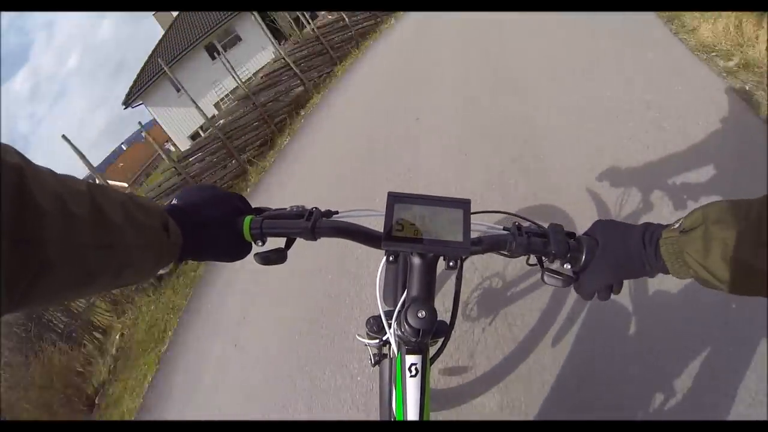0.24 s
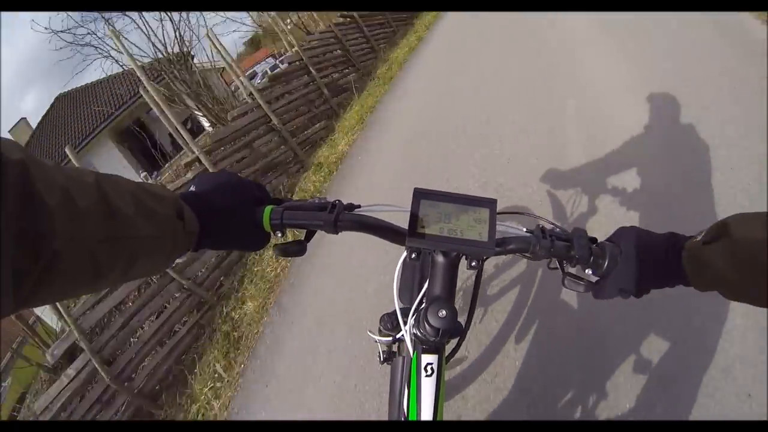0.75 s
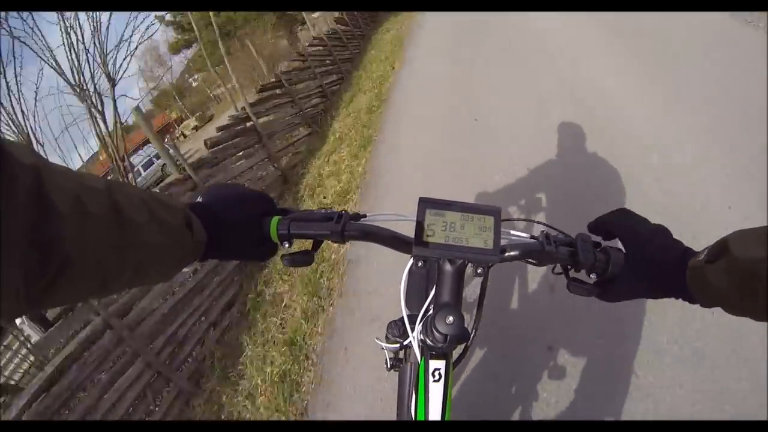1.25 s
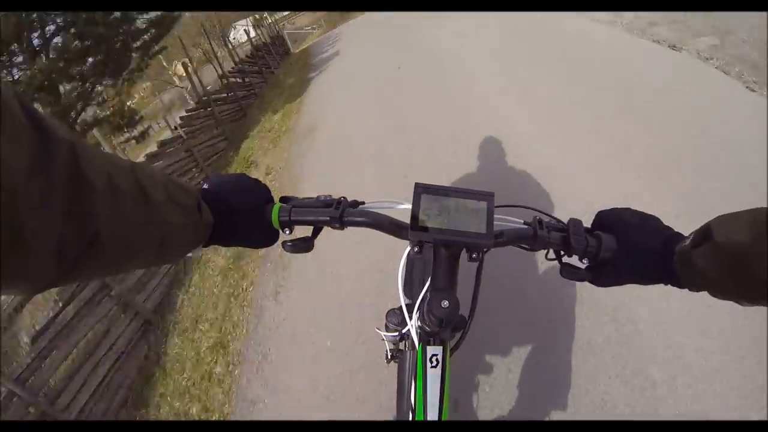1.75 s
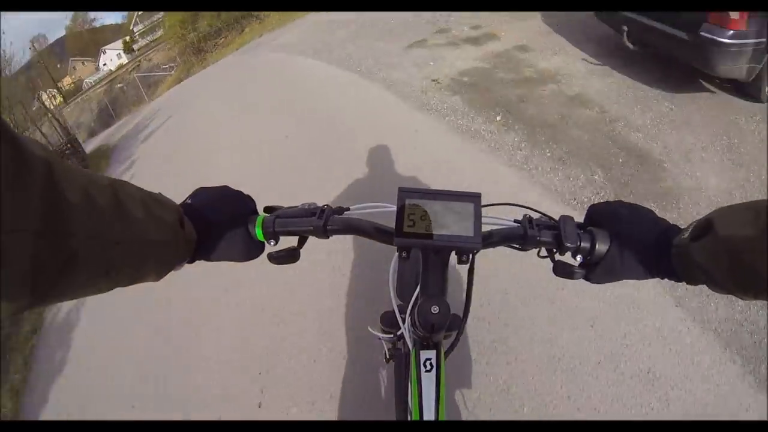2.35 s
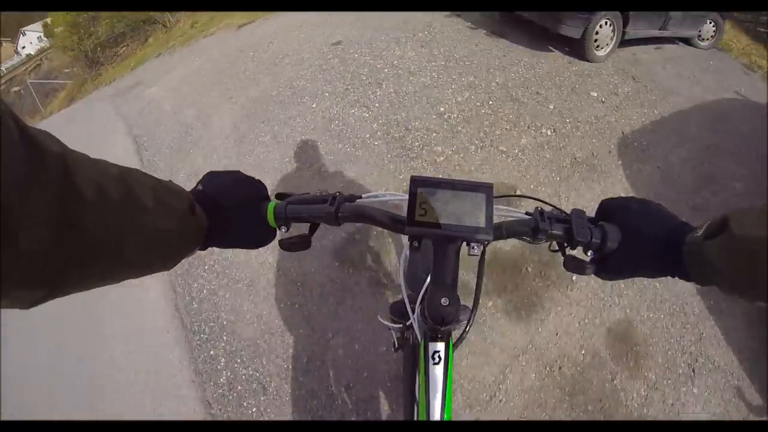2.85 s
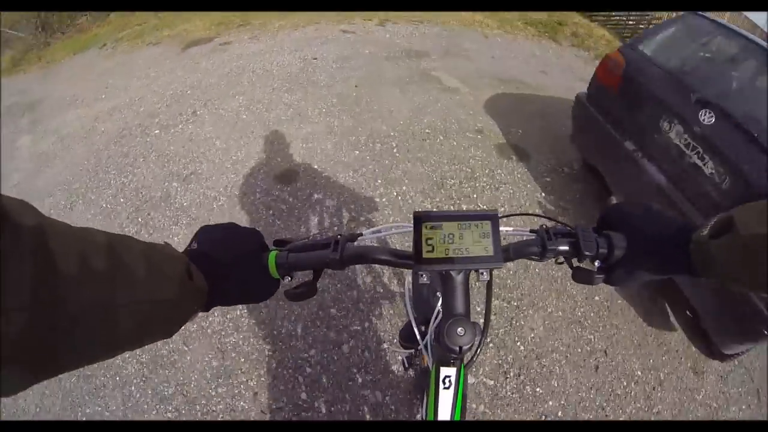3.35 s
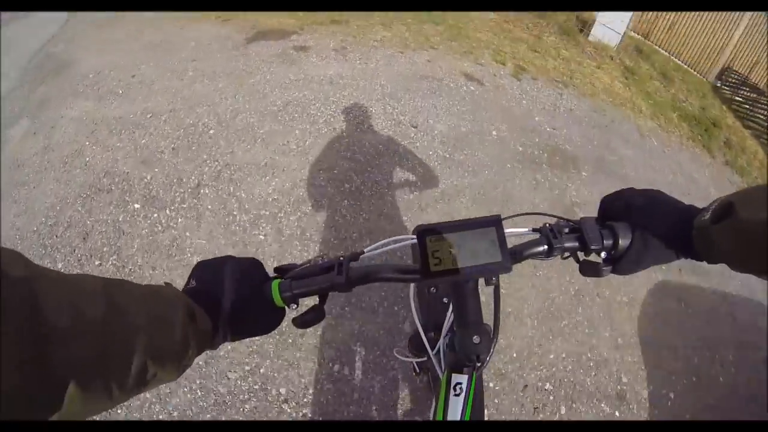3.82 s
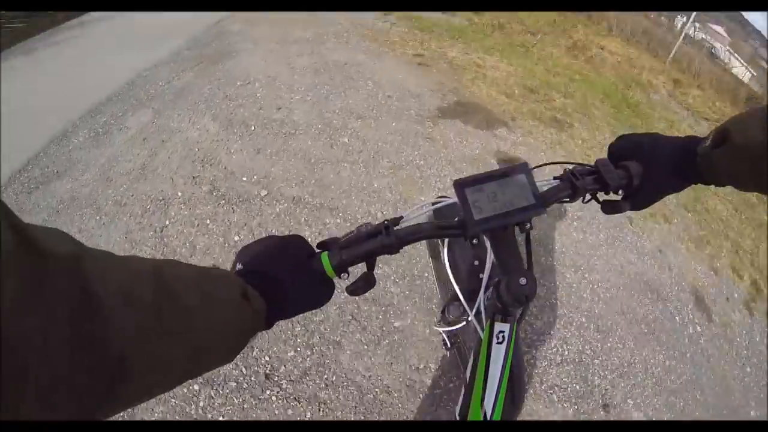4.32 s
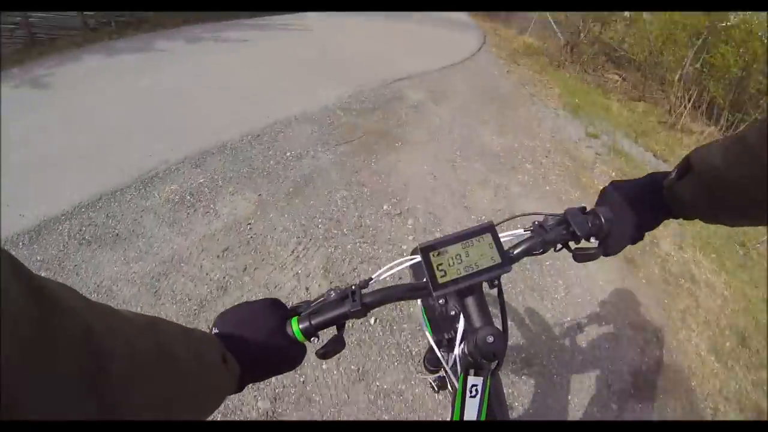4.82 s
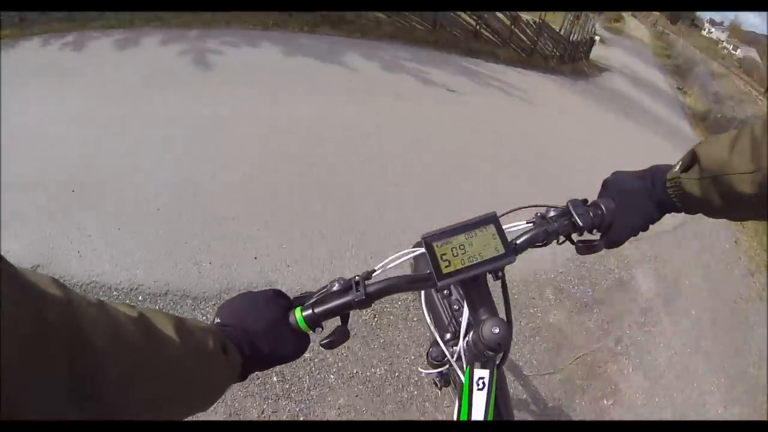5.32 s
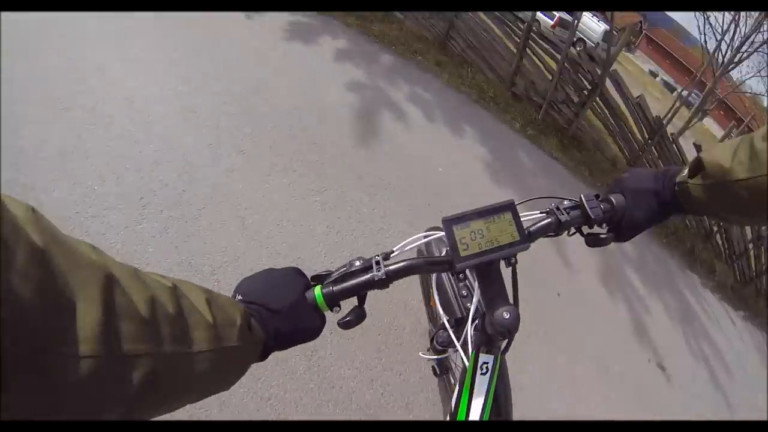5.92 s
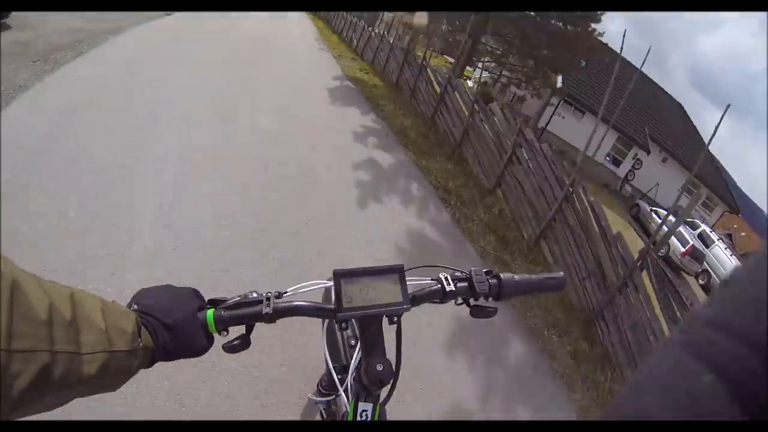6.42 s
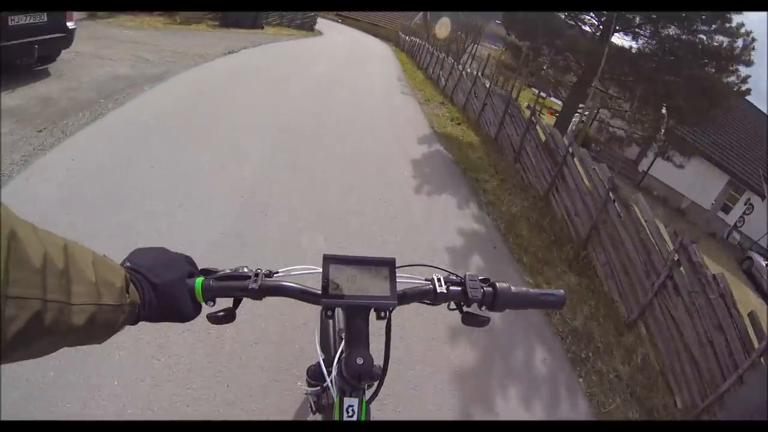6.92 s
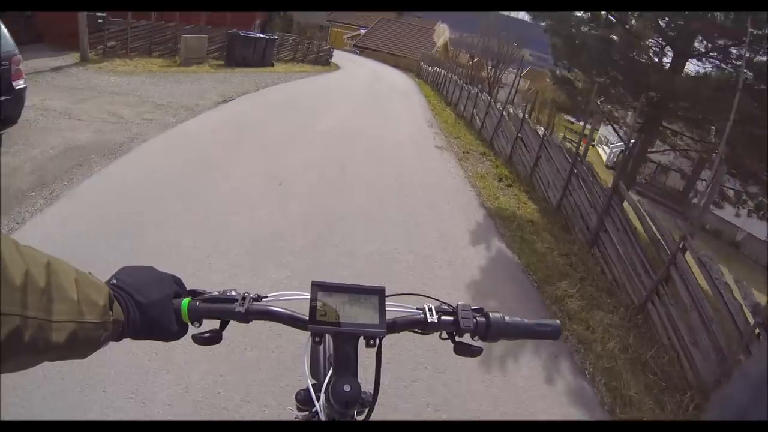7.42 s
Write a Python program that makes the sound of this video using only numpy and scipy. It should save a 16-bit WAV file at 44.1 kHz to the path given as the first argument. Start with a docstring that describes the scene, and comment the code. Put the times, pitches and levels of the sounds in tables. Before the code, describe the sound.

An electric bicycle rides outdoors, heard from a cased microphone on the rider. Deep, uneven wind rumble runs throughout, over a thin, slightly wavering motor whine and a boxy whirr of drive and tyres. A freewheel ticks very faintly at first. From about 2 to 4 seconds the disc brake sings softly on one high note, with tiny, much higher chirps. At about 2.8 seconds sharp clicks and a dull thud mark the move onto gravel. Stones crunch and pop, fittings click and grit hisses in short swells, with more thuds around 5 and 6 seconds. Near 6 seconds the tyres return to firmer ground. At 6.6 seconds a glove rubs across the microphone in scratchy strokes, then knocks its case several times, loudest at about 7 and 7.3 seconds, well above the ride. One more brief rub comes at about 7.6 seconds.

```python
"""An electric bicycle rolls over asphalt, heard from a cased camera on the rider: wind buffets the case,
the motor whines, the freewheel ticks, and drive and tyre noise ring in the case's resonances.
From about 2 s the disc brake sings and chirps through a turn onto gravel, where stones crunch, fittings
click and rough patches swell and thud. Near 6 s the bicycle is back on firmer ground.
From 6.6 s a glove rubs over the camera and knocks it several times."""
import sys
import numpy as np
from scipy import signal
from scipy.fft import rfft, irfft, next_fast_len
from scipy.io import wavfile
from scipy.ndimage import uniform_filter1d

SR = 44100
rng = np.random.default_rng(int(sys.argv[2]) if len(sys.argv) > 2 else 0)


def file_out(sig):
    """Save sig as 16-bit WAV at sys.argv[1]."""
    # one column per channel
    cols = np.atleast_2d(sig).T
    # limit, then scale
    lim = np.clip(cols, -1, 1)
    pcm = np.round(lim * 32767).astype(np.int16)
    wavfile.write(sys.argv[1], SR, pcm)


N = 337806
TIME = np.arange(N) / SR

# The wind bed. Each row: time in seconds, rumble in dB, deep sway in dB.
WIND_LEVELS = [(0, -41.5, -20.5), (0.7, -43.5, -37), (1.05, -42.5, -33.5), (1.35, -41.5, -27.5),
               (1.8, -47, -40.5), (2.1, -45, -35), (2.74, -50.5, -40), (2.9, -36.5, -29.5),
               (3.1, -47.5, -17), (3.4, -42.5, -30), (3.75, -44, -30.5), (4.25, -50.5, -38.5),
               (4.9, -47, -29.5), (5.4, -51, -22.5), (5.8, -42, -37), (6.4, -44.5, -38.5),
               (6.7, -38.5, -30.5), (7.3, -50.5, -32.5), (7.65, -49, -27)]
# Swells and dips of the deep sway and rumble as the bicycle rides along. Each row: middle and half
# length in seconds, change of sway and of rumble in dB.
SWAY_SWELLS = [(0.317, 0.038, -0.5, -5.5), (0.655, 0.12, 5, 3.5), (0.85, 0.061, 7, -2),
               (1.307, 0.11, 2, -1.5), (1.604, .06, 5, 6), (1.753, 0.13, 13.5, 1), (1.987, 0.043, 6.5, 1),
               (2.428, 0.26, 6.5, 0), (3.34, 0.089, 6.5, -2), (3.75, 0.077, 8.5, -8), (4.483, 0.023, 9, 1),
               (4.77, 0.031, 1.5, 5), (5.32, 0.092, -4, -7), (5.458, 0.046, -13, -4), (5.627, 0.015, 7, -2),
               (6.07, 0.098, 7, -6)]
# Wind colours, from deep to bright. Each row: frequency in Hz, spectral level in dB.
SWAY_EQ = [(8, -8), (16, 9.5), (28, -3.5), (38, -2), (55, -22.5), (90, -20.5), (200, -92)]
RUMBLE_EQ = [(25, -43), (48, 1.5), (75, -5.5), (115, -7.5), (160, -20), (260, -47.5), (600, -68)]
BUFFET_EQ = [(70, -19), (150, 1), (230, -7), (320, -6.5), (450, -17), (620, -22), (1100, -24), (2500, -59)]

# The coasting freewheel. Each row: time in seconds, ticks per second, level in dB.
FREEWHEEL = [(0, 95, -82), (0.7, 86, -88), (1.4, 134, -83), (2.0, 92, -81), (2.5, 66, -100)]
# The drive's whirr, sinking as the bicycle slows. Each row: time in seconds, level in dB.
DRIVE_LEVELS = [(0, -53.5), (0.7, -52), (1.15, -55.5), (1.7, -57), (2.72, -62.5), (3.3, -58.5),
                (4.1, -62.5), (5.7, -65.5), (6.6, -58.5), (7.35, -68), (7.65, -60)]
# Narrow bands. Each row: centre in Hz, width in Hz, gain in dB.
PAWL_BANDS = [(6480, 610, 17), (7950, 420, -10)]  # pawls of the freewheel
WHIRR_BANDS = [(646, 270, -16), (977, 56, -13), (1357, 178, -5.5), (1539, 170, -0.5), (1910, 170, -15),
               (2280, 510, -14.5), (3400, 290, -17.5), (4890, 510, -27.5), (6610, 550, -28.5),
               (7810, 330, -26), (11220, 360, -34)]  # resonances of the case, plus a faint, thin electronic hiss near 11 kHz
RASP_BANDS = [(1463, 200, 3), (1814, 140, -0.5), (2060, 120, -8), (2600, 140, -22), (3230, 220, -14),
              (4700, 380, -24), (6050, 500, -27.5)]  # cloth on the shell

# The ground. Each row: time in seconds, looseness from 0 to 1, tyre hiss and crunch in dB.
GROUND = [(0, 0.2, -68), (0.7, 0, -70), (1.5, 0.53, -64.5), (2.8, 0.46, -64.5), (2.87, 0.91, -66),
          (4.2, 0.87, -64.5), (4.8, 0.82, -67.5), (5.6, 0.85, -68), (5.75, 0.13, -66), (6.6, 0.36, -62),
          (7.45, 0.76, -70)]
# Rough patches. Each row: middle and half length in seconds, lift of rolling and of buffeting in dB.
ROUGH_PATCHES = [(0.593, 0.28, -1, 4.5), (1.505, 0.042, 1.5, 0.5), (1.637, 0.034, 4.5, 8),
                 (2.932, 0.094, 7.5, -3), (3.05, 0.036, -1, -5), (3.128, 0.1, 8, 4.5), (3.643, 0.15, 6, -4),
                 (4.295, 0.036, 6.5, 1.5), (4.406, 0.02, 9, -2), (4.81, 0.17, 8.5, 4.5),
                 (4.92, 0.029, 6, -1), (4.982, 0.095, 3.5, 9), (5.215, 0.086, 5, 7.5), (5.45, 0.13, 5, 2),
                 (5.604, 0.033, 9, 7), (5.87, 0.059, 6.5, -0.5), (6.014, 0.04, 5, 8.5),
                 (6.486, 0.15, -0.5, 4)]
# The tread sweeping through grit. Each row: middle and half length in seconds, level in dB.
GRIT_SWEEPS = [(2.885, 0.021, -52), (4.823, 0.029, -52.5), (4.9, 0.04, -55), (4.976, 0.027, -49),
               (5.042, 0.036, -58), (5.156, 0.047, -55), (5.361, 0.028, -56), (5.523, 0.03, -58),
               (5.757, 0.028, -56.5), (6, 0.078, -61), (6.282, 0.085, -81), (6.432, 0.052, -54),
               (6.53, 0.033, -50.5)]
# Dips that bounce the rider and bumps that thud in the frame. Each row: time in seconds, level in dB.
DIPS = [(2.888, -10), (3.119, -9)]
BUMPS = [(3.013, -21), (4.845, -30), (4.923, -22.5), (5.31, -30), (6.048, -23), (6.575, -24)]
# Stones and fittings. Each row: start in seconds, level in dB, ring in Hz, fade in seconds, snap share.
CLICKS = [(1.503, -39.5, 1350, 0.0014, .1), (1.739, -42, 3420, 0.0021, 0.27),
          (2.8454, -27.5, 1510, 0.0064, 0.11), (2.848, -32.5, 3280, 0.0032, 0.33),
          (2.8485, -29.5, 2230, 0.0041, 0.092), (3.205, -39.5, 1550, 0.0019, 0.29),
          (3.266, -34, 1600, 0.0028, 0.27), (3.592, -44, 1580, 0.0015, 0.18),
          (3.635, -39, 1560, 0.0021, 0.084), (3.851, -42, 1580, 0.0032, 0.16),
          (3.921, -45, 1610, 0.0014, 0.49), (4.06, -38.5, 1520, 0.0013, 0.09),
          (4.1833, -33.5, 2250, 0.0041, 0.29), (4.818, -42, 2340, 0.0066, 0.3),
          (4.994, -39, 1540, 0.007, .1), (5.144, -42, 1540, 0.006, 0.22), (5.281, -55, 3420, 0.0008, 1),
          (5.425, -42.5, 2340, 0.0027, 0.82), (5.563, -47, 1540, 0.0023, 0.16),
          (5.604, -39, 1500, 0.0025, 0.14), (5.835, -53, 3500, 0.002, 0.74),
          (6.049, -40, 1370, 0.0027, 0.091), (6.065, -41.5, 1310, 0.0041, 0.19),
          (6.253, -36, 1460, 0.0013, 0.056), (6.309, -44.5, 1490, 0.0014, 0.12),
          (6.412, -44, 1570, 0.0046, .05), (6.502, -41, 1400, 0.00095, 0.079),
          (7.28, -29.5, 3280, 0.00008, 0.27)]
# Ground colours. Each row: frequency in Hz, spectral level in dB.
GRAVEL_EQ = [(300, -17), (800, -27), (1150, -33), (1550, -25), (1750, -16), (1880, 8), (2040, -3),
             (2260, 8.5), (2450, -5.5), (2850, -4), (3450, 0), (4200, -7), (5200, -8), (8800, -17.5),
             (15000, -27.5)]  # crunch under the tyres
PEBBLE_EQ = [(500, -19), (1000, -9), (1500, -6), (1900, -14), (2350, 18.5), (2950, -4), (3450, 13),
             (4300, -15), (5500, -31), (8000, -42), (15000, -48)]  # single stones popping
GRIT_EQ = [(300, -15), (700, -7), (1050, -3), (1500, 7.5), (1900, -6.5), (2400, 1), (2950, -11), (3500, -4),
           (4400, -15), (6500, -19), (9000, -29), (15000, -36)]  # dry hiss under the tread
SCRAPE_EQ = [(300, 10), (800, -19), (1150, -15), (1500, 20.5), (1950, 1), (2330, 9.5), (2950, -9),
             (3450, 3.5), (4200, -38), (5200, -23), (8000, -24), (15000, -47)]  # a stone's scrape, muffled by the case
SNAP_EQ = [(1500, -26), (2300, 2), (3500, 18), (5000, 0), (8000, -12), (11000, -30), (15000, -33)]  # a hard contact

# Squeezes of the brake. Each row: start and length in seconds, singing in dB, rubbing in dB.
BRAKE_SQUEEZES = [(1.934, 0.25, -62.5, -63.5), (2.184, 0.05, -50.5, -56), (2.23, 0.051, -56, -57),
                  (2.295, 0.096, -59, -59), (2.508, 0.62, -76, -68.5), (3.08, 0.696, -68, -62),
                  (3.822, 0.14, -75, -65.5), (3.996, 0.075, -62, -61)]
# Thin chirps of the disc. Each row: middle in seconds, level in dB, pitch in Hz, length in seconds,
# glide as a share of the pitch.
DISC_CHIRPS = [(1.889, -66, 12200, 0.04, .03), (1.922, -59, 12500, 0.043, 0.037),
               (2.112, -63, 12530, 0.027, 0), (2.148, -75, 13350, 0.098, .07),
               (2.413, -68, 13000, 0.03, .01), (2.49, -64, 13950, 0.094, 0.024),
               (2.636, -72, 13500, 0.056, .03), (2.732, -64, 13250, 0.04, -.02),
               (2.785, -75, 13800, 0.06, .04), (3.146, -60.5, 13250, 0.024, .01),
               (3.57, -53, 13130, 0.04, -.012), (3.629, -63, 13450, 0.05, .025),
               (3.75, -64, 14050, 0.088, -.03), (3.971, -53.5, 10630, 0.046, -.01),
               (4.059, -61, 10650, 0.045, .03), (4.085, -64, 11500, 0.035, 0.014)]

# Strokes of the glove. Each row: start, rise and length in seconds, level in dB, share of sharp
# scratch, pitch ratio of the rasp.
GLOVE_STROKES = [(6.636, 0.0031, 0.02, -33.5, 0.061, 1.03), (6.661, 0.012, 0.019, -35.5, 0.1, 1.06),
                 (6.687, 0.01, 0.024, -32, 0.04, 1.12), (6.709, 0.013, 0.047, -31.5, 0.098, 1.1),
                 (6.775, 0.028, 0.038, -29, 0.28, 1.06), (6.829, 0.041, 0.074, -37.5, 0.05, 1.1),
                 (6.876, 0.0086, 0.054, -34.5, 0.055, 1.0), (6.94, 0.012, 0.087, -47, 0.32, 1.15),
                 (7.032, 0.011, 0.247, -54, 0.25, 1.08), (7.589, 0.11, 0.08, -34, 0.21, 0.95)]
# Knocks of the glove. Each row: time in seconds, push in dB, contact in seconds, sway in dB, sway in Hz,
# shell ring in dB, hardness as the ring's cutoff in Hz, hollow ring in dB, crack in dB.
KNOCKS = [(6.897, -11, 0.00021, -17.5, 89, -8.5, 1810, -44, -35),
          (6.9787, 0.5, 0.00038, -10.5, 46.8, 0.5, 4500, -26, -9.5),
          (7.071, -15.5, 0.00061, -4.5, 30, -43, 2500, -57, -33),
          (7.102, -31, 0.00024, -47, 30, -26, 1700, -40.5, -33),
          (7.218, -30, 0.00044, -18.5, 28.2, -13.5, 1400, -33, -40),
          (7.2567, -0.5, 0.00052, -2.5, 31.7, -1, 1410, -33, -22),
          (7.315, -42, 0.00021, -27, 40.5, -45, 900, -51, -55),
          (7.358, -44, 0.00025, -31, 40.4, -37, 1200, -46.5, -42),
          (7.423, -41, 0.00039, -47, 40, -52, 900, -67, -58)]
# Modes of the struck case. Each row: pitch in Hz, level in dB, time to fall 60 dB in seconds.
SHELL_MODES = [(784, -8.5, 0.0076), (1504, 0, 0.013), (1935, 2.5, 0.0053), (2500, -3.5, 0.0067),
               (3490, -7, 0.011), (4550, -15.5, 0.017), (6960, -30, 0.0026)]
# Close-up colours. Each row: frequency in Hz, spectral level in dB.
RUB_EQ = [(300, -49), (600, -16), (780, -10), (930, -13), (1150, -9.5), (1330, 5.5), (1500, 0),
          (2000, -1.5), (2450, -8), (3000, -15.5), (4400, -22.5), (6500, -42), (11000, -43), (15000, -60)]  # body of the glove's rub
SCRATCH_EQ = [(1500, -31), (2800, 5), (3800, 3.5), (5000, -6), (7000, -11.5), (9000, -32), (15000, -41)]  # scratching fibres
FIZZ_EQ = [(3000, -9.5), (6500, -3), (8800, -7.5), (10500, -8), (13500, -15), (15000, -23)]  # fizz of the cloth
CRACK_EQ = [(200, -7), (650, -7), (1000, 4), (1450, 7), (2700, -7), (4000, -18), (5500, -18.5), (8000, -27),
            (15000, -38)]  # a loose joint in the case
MIC_HISS_EQ = [(1000, -23), (11000, 13), (13000, -5), (15000, -10)]  # the microphone's noise floor


def amp(db):
    """Decibels to gain."""
    return 10 ** (np.asarray(db) / 20)


def unit(x):
    """Scales to rms 1."""
    return x / np.sqrt(np.mean(x ** 2) + 1e-20)


def noise(n=N):
    """White noise of rms 1."""
    return rng.standard_normal(n)


def curves(rows):
    """Each column of a time table as an automation curve."""
    s, *columns = np.transpose(rows)
    return [np.interp(TIME, s, column) for column in columns]


def add(mix, s, sound):
    """Mixes a sound in at time s."""
    part = mix[max(round(s * SR), 0):][:len(sound)]
    part += sound[:len(part)]


def colour(x, points):
    """Equalises by a curve of (Hz, dB) points."""
    hz, db = np.transpose(points)
    size = 2 * next_fast_len(len(x) // 2 + 2048)
    bins_hz = np.fft.rfftfreq(size, 1 / SR)
    gain = amp(np.interp(np.log(bins_hz + 1), np.log(hz + 1), db))
    return irfft(rfft(x, size) * gain)[:len(x)]


def resonate(x, hz, width):
    """A resonance of gain 1, applied twice for steep flanks."""
    b, a = signal.iirpeak(min(hz, SR * .45), hz / (1.55 * width), fs=SR)
    return signal.lfilter(b, a, signal.lfilter(b, a, x))


def glide(x, hz, width):
    """A steep resonance of gain 1 that follows the curve hz."""
    carrier = np.exp(2j * np.pi * np.cumsum(hz) / SR)
    r = np.exp(-1.55 * np.pi * width / SR)
    return 2 * (carrier * signal.lfilter([(1 - r) ** 2], [1, -2 * r, r * r], x / carrier)).real


def sine(hz):
    """A sine that follows the pitch curve hz."""
    return np.sin(2 * np.pi * np.cumsum(hz) / SR)


def wander(per_s):
    """Smooth random modulation of rms 1 that changes so many times a second."""
    knots = rng.standard_normal(8192)
    return unit(np.interp(TIME * per_s, np.arange(len(knots)), knots))


def grains(per_s, spread_db):
    """Sparse clicks of unequal size."""
    size = amp(spread_db * np.minimum(rng.exponential(1, N), 4))
    return unit(size * rng.choice([-1, 1], N) * (rng.random(N) < per_s / SR))


def hump(s, half):
    """Envelope that swells to 1 at time s and sinks again."""
    return np.exp(-((TIME - s) / half) ** 2)


def swell(start, rise, length, release):
    """Envelope that eases in, holds to the end of its length and dies away."""
    t = TIME - start
    attack = np.sin(np.pi / 2 * np.clip(t / rise, 0, 1)) ** 2
    return attack * np.exp(-np.maximum(t - length, 0) / release)


def push(t, contact_s):
    """One rounded pulse of pressure around t = 0."""
    return 1 / np.cosh(np.minimum(abs(t) / contact_s, 50))


def swing(t, hz, fade_s):
    """A few dying swings from t = 0 on."""
    after = np.maximum(t, 0)
    return np.sin(2 * np.pi * hz * after) * np.exp(-(after / fade_s) ** 2)


def patch_lift():
    """The dB that rough patches add to the rolling noise."""
    return sum(db * hump(s, half) for s, half, db, _ in ROUGH_PATCHES)


def wind(buffet_db=-5, eddy_db=2.1, speed_share=0.29):
    """Large eddies sway and rumble; small ones flutter on the case, more at speed and on rough patches."""
    rumble_db, sway_db = curves(WIND_LEVELS)
    flutter_db = (1 - speed_share) * rumble_db + speed_share * curves(DRIVE_LEVELS)[0] + buffet_db
    flutter_db += sum(db * hump(s, half) for s, half, _, db in ROUGH_PATCHES) - 0.2 * curves(GROUND)[0]
    sway_db += sum(db * hump(s, half) for s, half, db, _ in SWAY_SWELLS)
    rumble_db += sum(db * hump(s, half) for s, half, _, db in SWAY_SWELLS)
    sway = unit(colour(noise(), SWAY_EQ))
    sway /= np.sqrt(uniform_filter1d(sway ** 2, size=4000) + 0.02)  # evens out the large eddies
    eddies = amp(eddy_db * wander(per_s=45))
    rumble, flutter = (unit(colour(noise() * eddies, eq)) for eq in (RUMBLE_EQ, BUFFET_EQ))
    return amp(sway_db) * sway + amp(rumble_db) * rumble + amp(flutter_db) * flutter


def freewheel(tick_s=0.0008, uneven_db=3):
    """The pawls tick faintly over the ratchet, slower as the bicycle loses speed."""
    rate, level_db = curves(FREEWHEEL)
    since_tick = np.cumsum(rate) / SR % 1 / rate
    ticks = np.exp(-since_tick / tick_s) * noise() * amp(uneven_db * wander(per_s=60))
    return amp(level_db) * unit(sum(amp(db) * resonate(ticks, hz, width) for hz, width, db in PAWL_BANDS))


def motor(hz=1575, trim_db=-5.5, flutter_db=3.5):
    """A thin, slightly wavering whine stands out of the whirr of the drive."""
    pitch = hz * (1 + 0.014 * wander(per_s=19) + 0.016 * wander(per_s=200))
    whine = sine(pitch) * amp(flutter_db * wander(per_s=63))
    return amp(curves(DRIVE_LEVELS)[0] + trim_db + 0.71 * patch_lift()) * unit(whine)


def rolling(whirr_trim_db=-0.36, crunch_trim_db=-3, shake_db=2.5, grit=0.62, rattle=0.45):
    """Drive and tyres ring the case under a thin hiss; stones crackle; all swell on rough patches."""
    loose, tyre_db = curves(GROUND)
    whirr_db = curves(DRIVE_LEVELS)[0] + patch_lift() + whirr_trim_db
    crunch_db = tyre_db + 0.22 * patch_lift() + crunch_trim_db
    shake = amp(shake_db * np.sqrt(loose) * wander(per_s=50))  # steady on asphalt, uneven on gravel
    ticks = rattle * loose * grains(per_s=300, spread_db=7)  # small parts rattle on the frame
    whirr = unit(sum(amp(db) * resonate(noise() + ticks, hz, width) for hz, width, db in WHIRR_BANDS))
    crunch = unit(colour(noise() + grit * loose * grains(per_s=780, spread_db=4.5), GRAVEL_EQ))
    return shake * (amp(whirr_db) * whirr + amp(crunch_db) * crunch)


def pebbles(level_db=-63, patch_share=0.8, grind=0.97):
    """On very loose ground single stones grind and pop under the tyres, most on the rough patches."""
    loose = curves(GROUND)[0]
    pops = grains(per_s=700, spread_db=6.5) + grind * noise()
    return amp(level_db + patch_share * patch_lift()) * loose ** 5 * unit(colour(pops, PEBBLE_EQ))


def tread(grind=0.83, shake_db=1.5):
    """The tread sweeps through loose grit in short, dry, crackling swells."""
    level = sum(amp(db) * hump(s, half) for s, half, db in GRIT_SWEEPS)
    crackle = grains(per_s=1400, spread_db=5.5) + grind * noise()
    return level * amp(shake_db * wander(per_s=60)) * unit(colour(crackle, GRIT_EQ))


def jolts(thump_db=-12.5, frame_db=-13, lead_s=0.02):
    """Dips bounce the rider slowly; bumps give a dull thud, a short thump and a ring of the frame."""
    bounces = sum(amp(db) * swing(TIME - s, hz=25.9, fade_s=0.05) for s, db in DIPS)
    out = uniform_filter1d(bounces, size=400)  # the rider's body softens the start
    t = np.arange(SR // 5) / SR - lead_s
    thump = amp(thump_db) * swing(t, hz=67, fade_s=0.017)
    frame = amp(frame_db) * swing(t, hz=274, fade_s=0.0059)
    thud = thump + frame - push(t, contact_s=0.00099)
    for s, db in BUMPS:
        add(out, s - lead_s, amp(db) * thud)
    return out


def clicks(ring=7.5, dryness=0.49, snap_s=0.0023):
    """Each stone or fitting gives a snap and a scrape with one ringing band; the briefest are dry ticks."""
    out, t = np.zeros(N), np.arange(2048) / SR
    for s, db, hz, fade, snap_share in CLICKS:
        burst = noise(len(t)) * np.exp(-t / fade) * (1 - np.exp(-2 * t / fade))
        body = colour(burst, SCRAPE_EQ) + ring * resonate(burst, hz, width=max(250, dryness / fade))
        snap = colour(burst * np.exp(-abs(t - fade / 2) / snap_s), SNAP_EQ)
        add(out, s, amp(db) * (body / abs(body).max() + snap_share * snap / abs(snap).max()))
    return out


def chatter(level_db=-83, middle_s=2.0, half_s=0.55, flicker_db=5):
    """A faint, very high chatter swells around the first chirps."""
    flicker = amp(flicker_db * wander(per_s=70))
    sizzle = resonate(noise(), hz=14100, width=800)
    return amp(level_db) * hump(middle_s, half_s) * unit(flicker * sizzle)


def disc_chirps(roughness=0.007, waver=0.009, flutter_db=3):
    """The disc gives short, rough squeaks that glide and waver."""
    out = np.zeros(N)
    jitter = roughness * wander(per_s=900) + waver * wander(per_s=90)
    for s, db, hz, length, slide in DISC_CHIRPS:
        n = int(length * SR)
        pitch = hz * (1 + slide * np.linspace(-.5, .5, n) + jitter[int(s * SR):][:n])
        add(out, s - length / 2, amp(db) * np.hanning(n) * sine(pitch))
    return out * amp(flutter_db * wander(per_s=98))


def brake(hz=2222, waver=0.00098, flutter_db=1.8):
    """At each squeeze the disc sings on one steady mode inside the narrow hiss of the pad."""
    sing, rub = np.zeros((2, N))
    for start, length, sing_db, rub_db in BRAKE_SQUEEZES:
        grip = swell(start, rise=0.037, length=length, release=0.043)
        sing = np.maximum(sing, amp(sing_db) * grip)
        rub = np.maximum(rub, amp(rub_db) * grip)
    pitch = hz * (1 + waver * wander(per_s=29))
    tone = np.sqrt(2) * sine(pitch) * amp(flutter_db * wander(per_s=47))
    return sing * tone + rub * unit(resonate(noise(), hz=2227, width=42))


def glove(slips_per_s=230, slip_s=0.0014, drag=0.45, uneven_db=0.5, hiss=0.25, fizz_db=-27):
    """Fibres stick and slip on the case in a scratchy rasp whose pitch shifts from stroke to stroke."""
    pressure, scratch_level, pitch = np.zeros(N), np.zeros(N), np.ones(N)
    for start, rise, length, db, share, ratio in GLOVE_STROKES:
        stroke = amp(db) * swell(start, rise, length, release=0.017)
        pitch = np.where(stroke > pressure, ratio, pitch)  # the strongest stroke sets the pitch
        pressure = np.maximum(pressure, stroke)
        scratch_level = np.maximum(scratch_level, share * stroke)
    fibres = grains(per_s=4000, spread_db=1.5)
    grip = amp(uneven_db * wander(per_s=140))
    rate = slips_per_s * np.exp(0.3 * wander(per_s=130))
    since_slip = np.cumsum(rate) / SR % 1 / rate
    friction = grip * (drag + np.exp(-since_slip / slip_s))
    slips = (fibres + hiss * noise()) * friction
    pitch *= 1 + 0.015 * wander(per_s=66)
    rasp = sum(amp(db) * glide(slips, hz * pitch, width) for hz, width, db in RASP_BANDS)
    body = unit(colour(slips, RUB_EQ) + rasp)
    scratch, fizz = (unit(colour(friction * noise(), eq)) for eq in (SCRATCH_EQ, FIZZ_EQ))
    return pressure * body + scratch_level * scratch + amp(fizz_db) * pressure ** 0.86 * fizz


def cracks(fade_s=0.0015):
    """Each knock jars the joints of the case into a short crack."""
    out, t = np.zeros(N), np.arange(2048) / SR
    for s, *_, crack_db in KNOCKS:
        burst = unit(colour(noise(len(t)), CRACK_EQ))
        add(out, s, amp(crack_db) * np.exp(-t / fade_s) * burst / 2)
    return out


def knocks(shell_trim_db=-4, sway_cycles=0.85, hollow_hz=690, hollow_t60_s=0.025, lead_s=0.02):
    """A blow pushes air into the case, the mount sways back, and the shell and the air inside ring."""
    out, t = np.zeros(N), np.arange(SR // 4) / SR - lead_s
    after = np.maximum(t, 0)
    for s, push_db, contact_s, sway_db, sway_hz, shell_db, hard_hz, hollow_db, _ in KNOCKS:
        blow = amp(push_db) * push(t, contact_s)
        sway = amp(sway_db) * swing(t, sway_hz, sway_cycles / sway_hz) * np.tanh(after / contact_s / 2)
        # a soft contact leaves the upper modes quiet and starts the ring gently
        shell = sum(amp(db - 60 * after / t60) * np.sin(2 * np.pi * hz * after) / (1 + (hz / hard_hz) ** 4)
                    for hz, db, t60 in SHELL_MODES)
        shell *= amp(shell_db + shell_trim_db) * np.tanh(after * hard_hz)
        hollow = amp(hollow_db - 60 * after / hollow_t60_s) * np.sin(2 * np.pi * hollow_hz * after)
        add(out, s - lead_s, sway - blow + shell + hollow)
    return out


def scene():
    """The ride, the brake and the glove all reach the one microphone in the case."""
    ride = wind() + rolling() + motor() + freewheel() + pebbles() + tread() + clicks() + jolts()
    return (ride + brake() + disc_chirps() + chatter() + knocks() + cracks() + glove())[None]


def record(dry):
    """Faint microphone hiss, soft saturation on the hardest knocks, then a steep high cut."""
    hiss_db, cutoff_hz = -85, 15300
    heard = dry + amp(hiss_db) * unit(colour(noise(), MIC_HISS_EQ))
    heard = heard / (1 + heard ** 6) ** (1 / 6)
    high_cut = signal.firwin(511, cutoff_hz, window=("kaiser", 9), fs=SR)
    return signal.oaconvolve(heard, high_cut[None], "same")


dry = scene()
out = record(dry)
file_out(out)
```